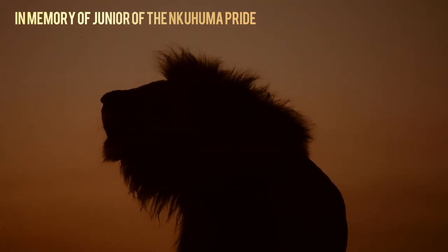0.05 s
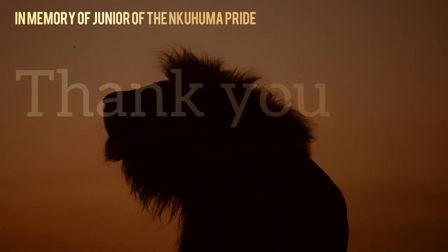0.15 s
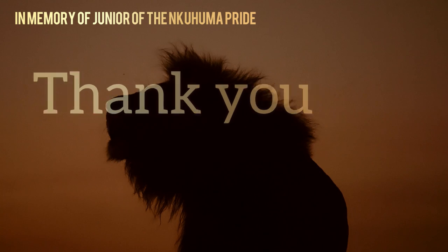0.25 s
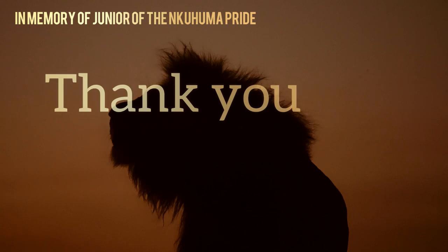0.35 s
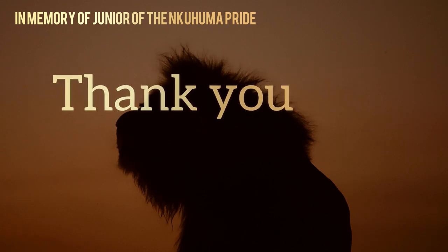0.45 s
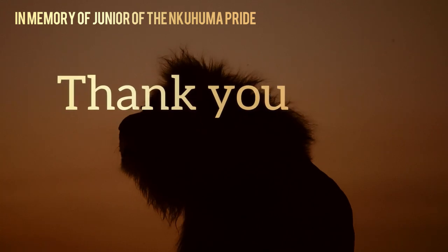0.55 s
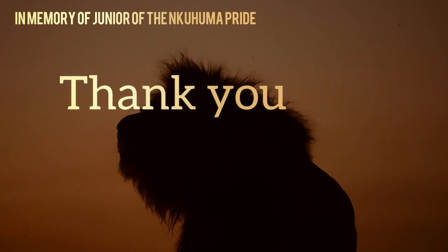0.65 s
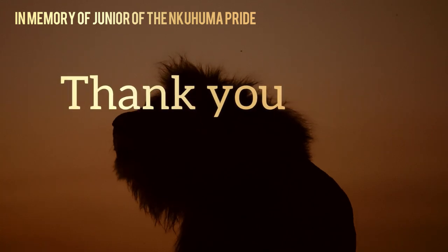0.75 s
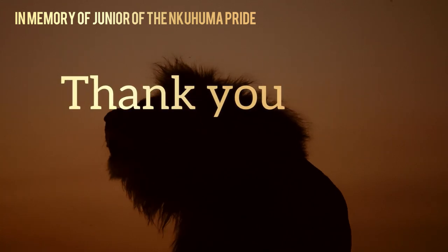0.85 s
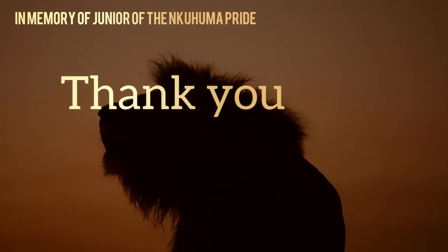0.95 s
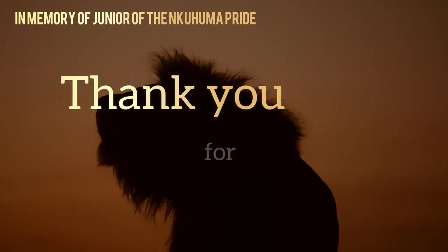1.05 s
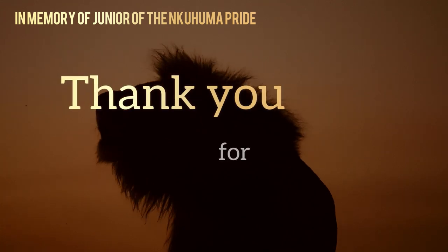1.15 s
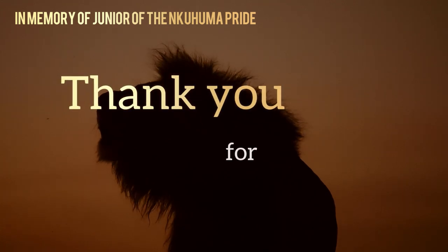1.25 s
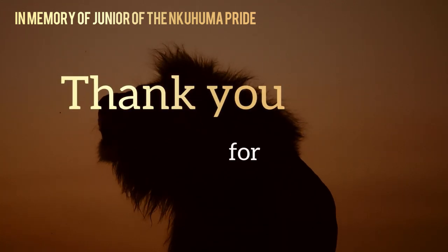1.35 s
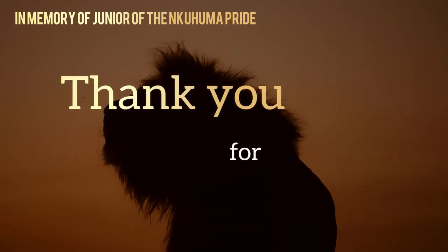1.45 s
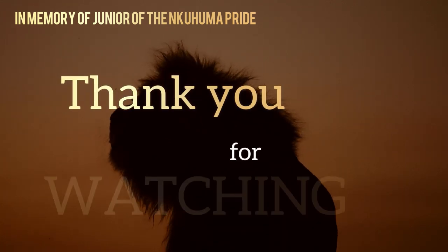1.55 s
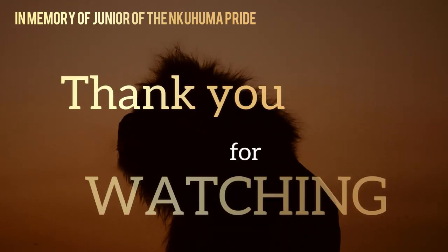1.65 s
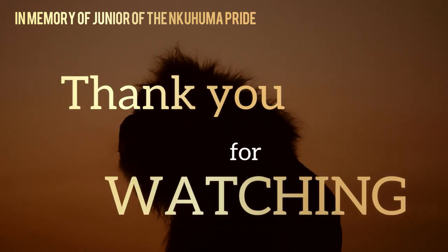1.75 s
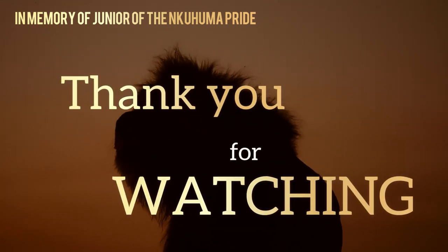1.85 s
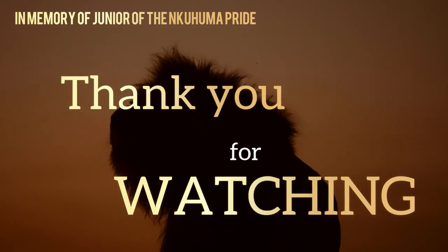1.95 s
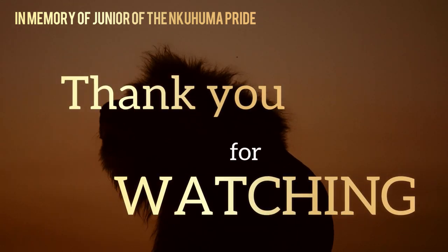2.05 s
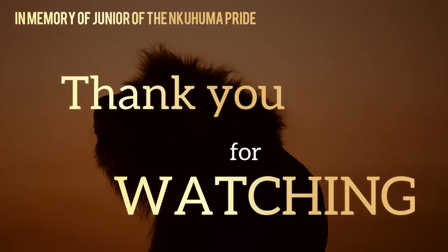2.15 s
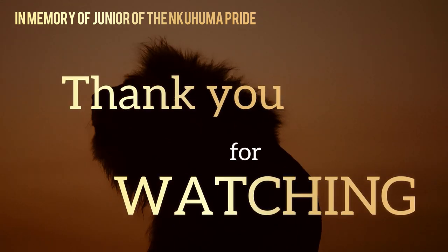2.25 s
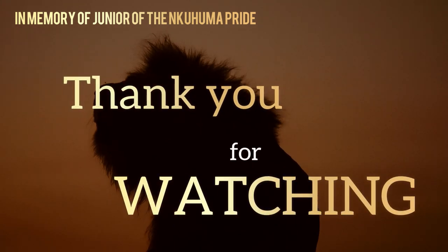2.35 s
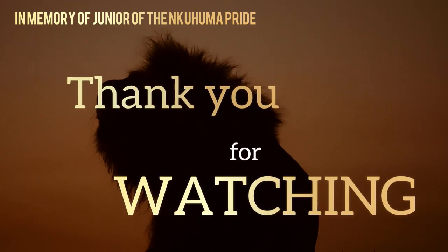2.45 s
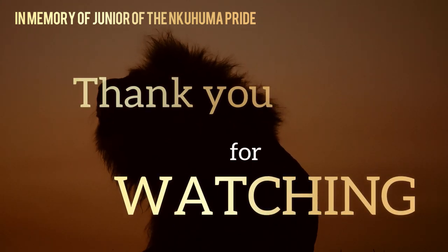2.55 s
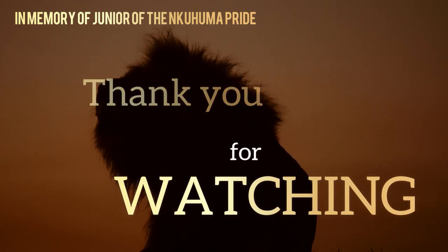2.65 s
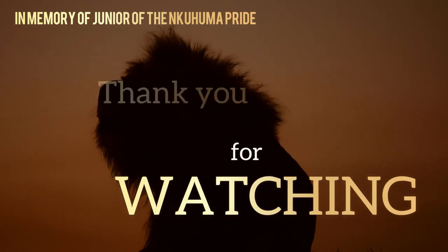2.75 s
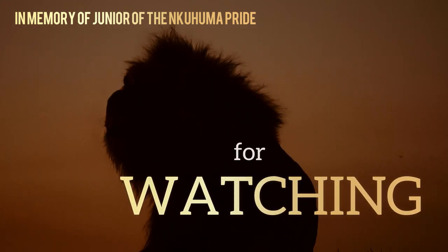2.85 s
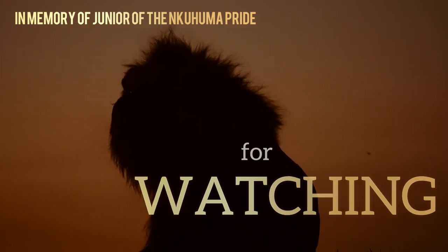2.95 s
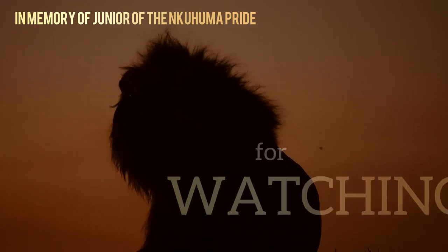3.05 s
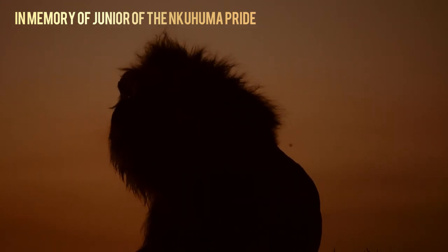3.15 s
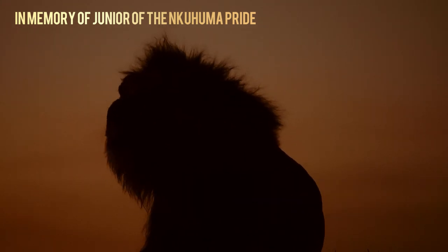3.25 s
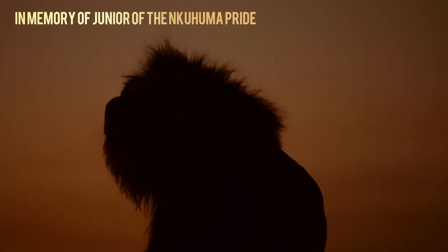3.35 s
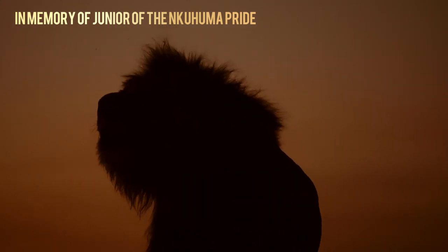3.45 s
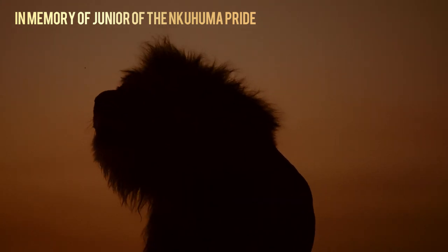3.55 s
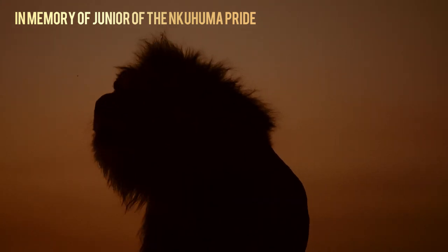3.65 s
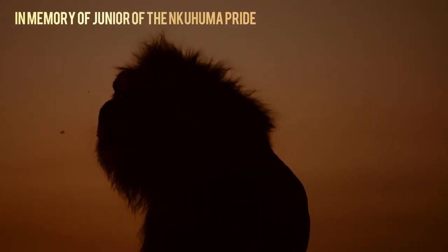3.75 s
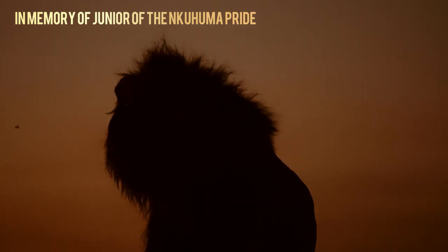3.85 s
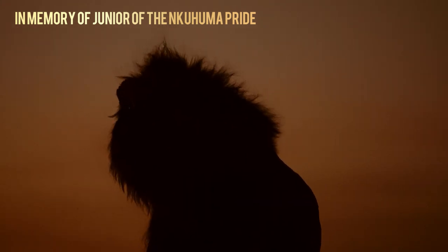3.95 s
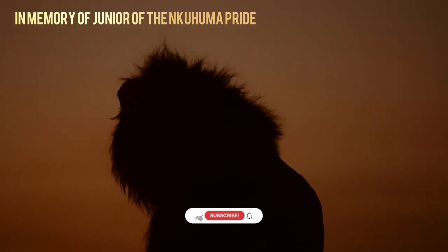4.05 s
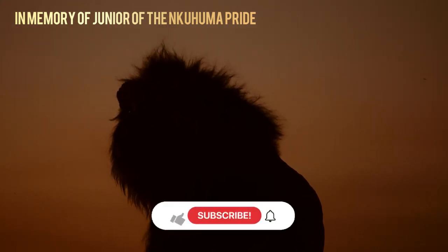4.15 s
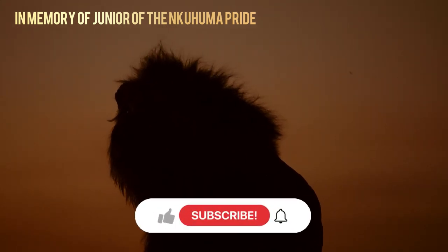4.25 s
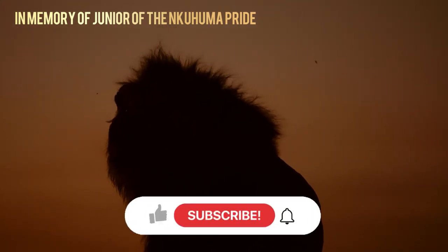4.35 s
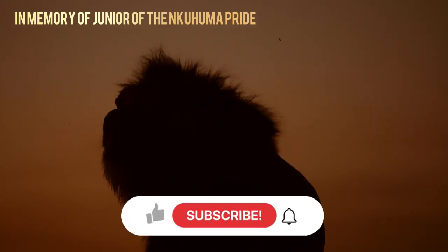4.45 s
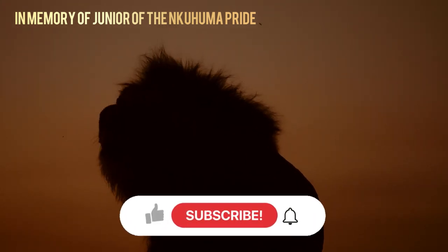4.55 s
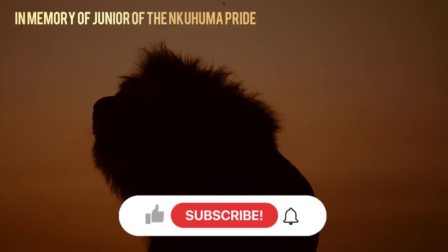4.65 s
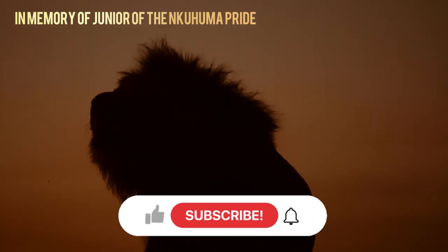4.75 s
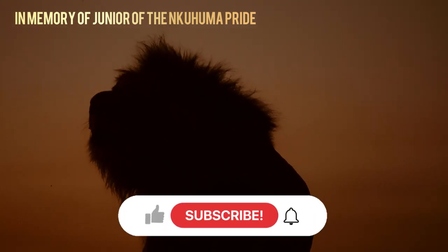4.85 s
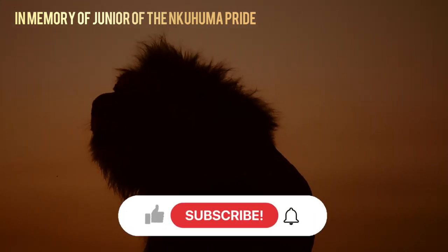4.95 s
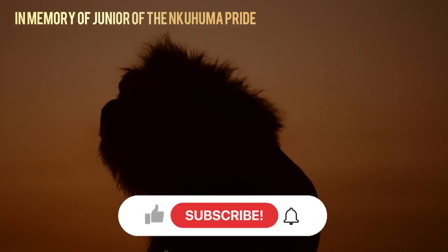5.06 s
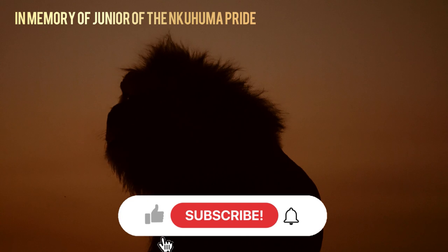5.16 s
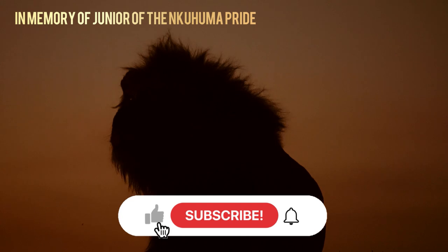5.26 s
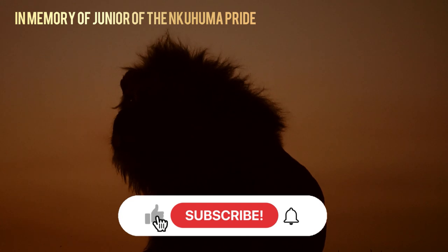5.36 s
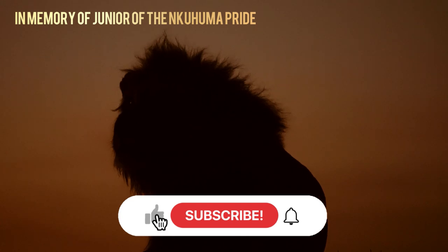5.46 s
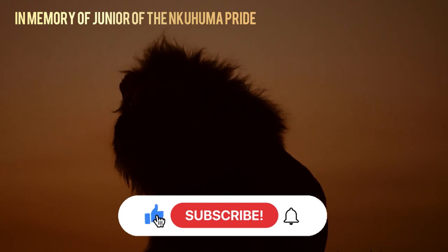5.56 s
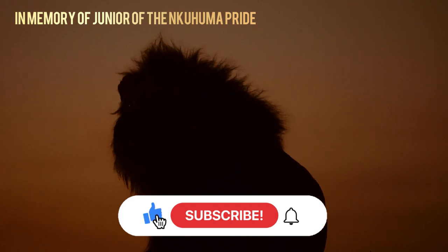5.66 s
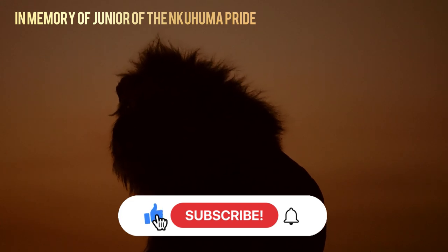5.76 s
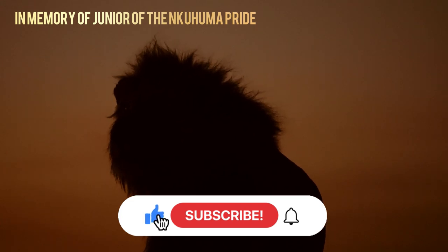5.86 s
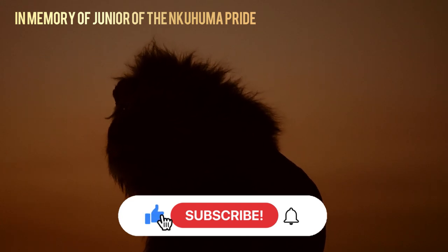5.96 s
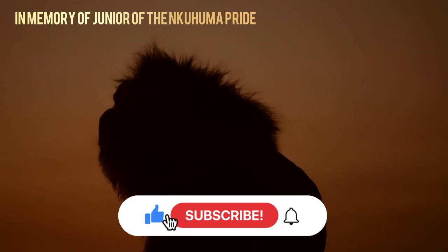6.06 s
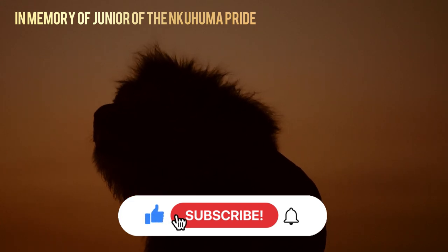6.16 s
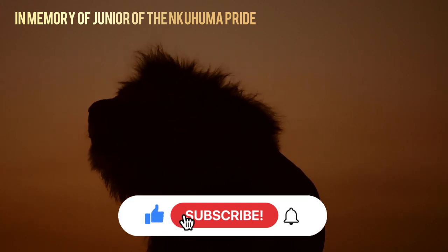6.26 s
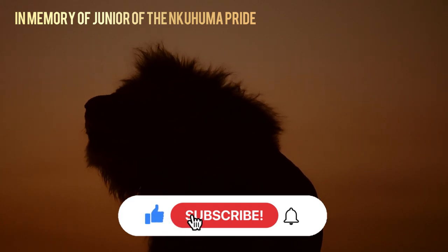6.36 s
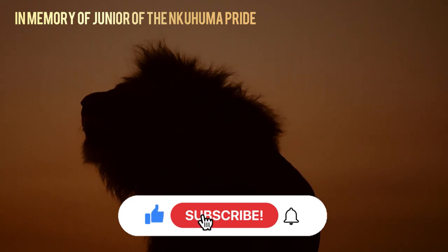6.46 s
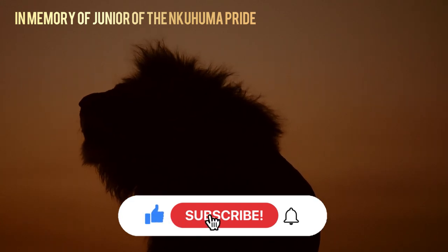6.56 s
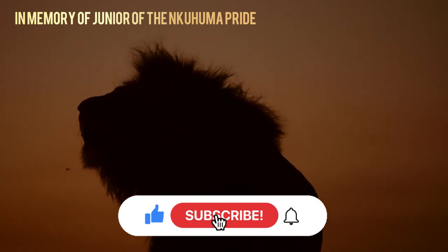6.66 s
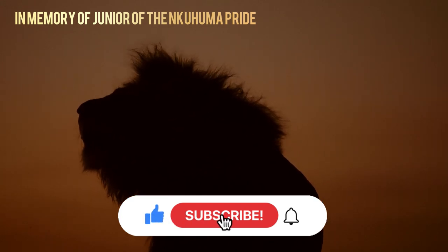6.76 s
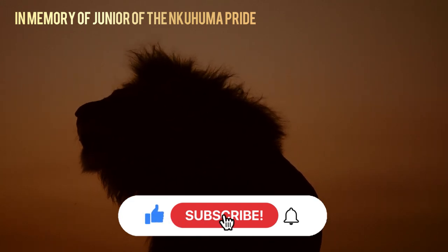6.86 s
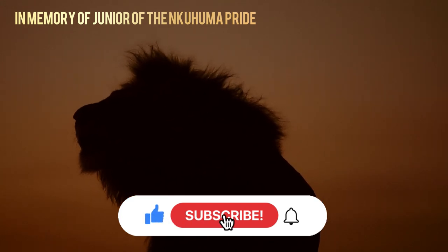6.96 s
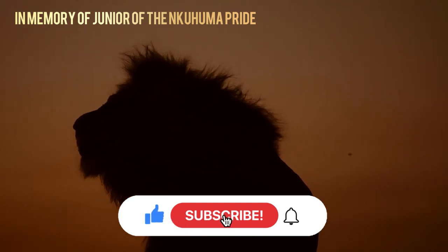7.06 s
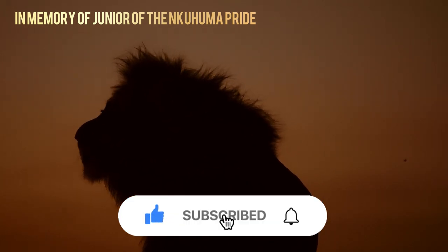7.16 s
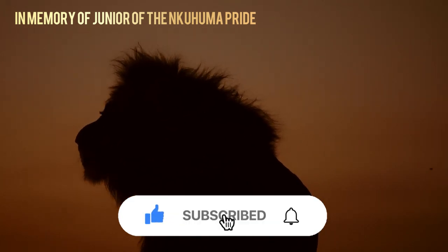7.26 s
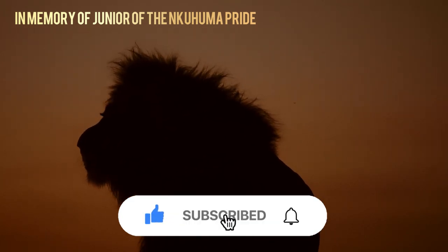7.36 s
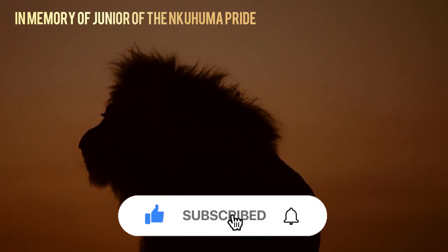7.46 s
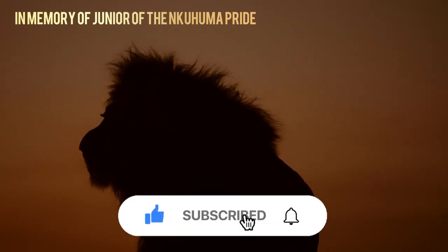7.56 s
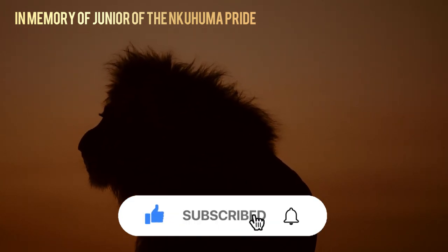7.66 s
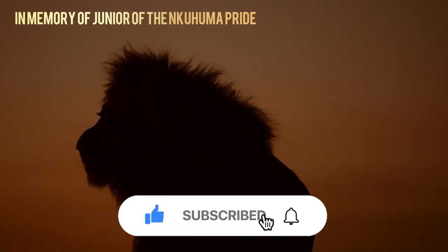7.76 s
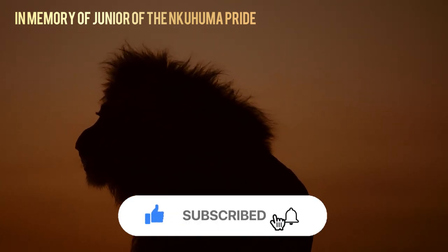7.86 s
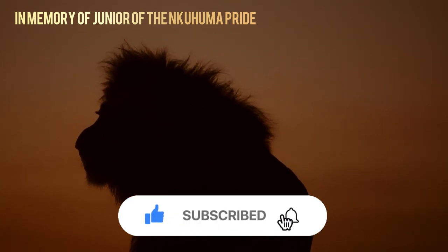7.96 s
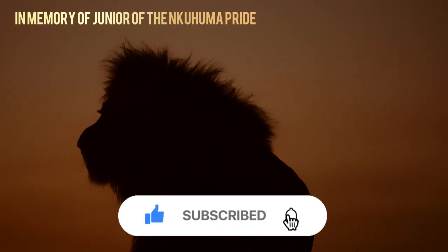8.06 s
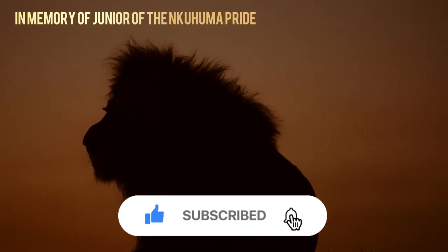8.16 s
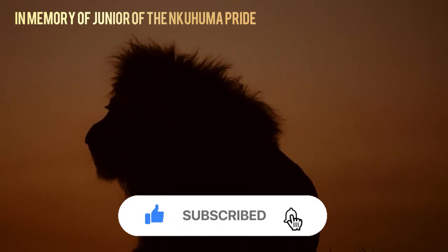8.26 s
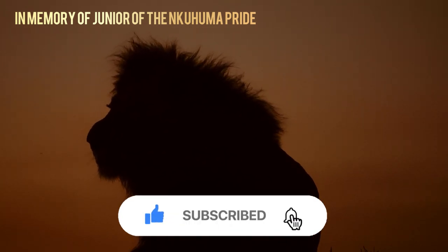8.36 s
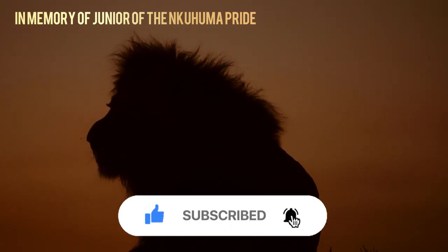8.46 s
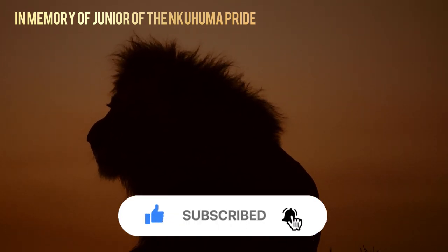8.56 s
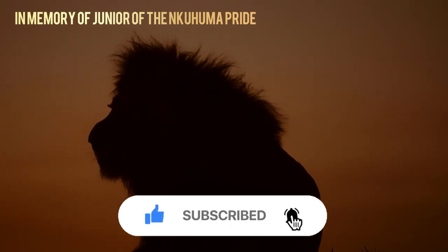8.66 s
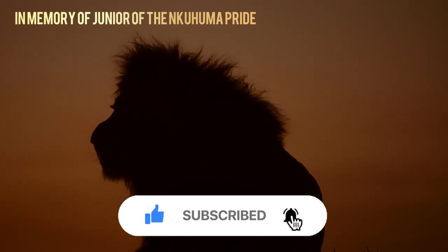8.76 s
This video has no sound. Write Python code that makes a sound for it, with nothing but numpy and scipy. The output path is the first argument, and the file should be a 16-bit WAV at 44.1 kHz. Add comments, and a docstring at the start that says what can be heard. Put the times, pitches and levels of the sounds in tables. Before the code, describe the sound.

Open bush at dusk, in stereo, with a lion close and near centre. The sound opens inside a deep grunting roar that ends around 0.3 s. More follow at about 1.0, 2.2, 3.5, 4.6 and 6.3 s, each roughly a quarter to two thirds of a second; the fourth is shortest and the last longest. Each jumps to a low, almost pure tone, then sinks into a gravelly rasp with loose slapping clicks and a small hollow closing ring. Faint indrawn breaths come before the later roars, and a short echo returns from the shrubs. Throughout there is low rumble, thin wide hiss and a far throbbing cricket chorus. Nearer crickets trill on the right, with clearer paired answers near 1.9, 4.2, 6.2 and 7.8 s. Very faint rising whistles, probably birds, and tiny dry ticks appear occasionally. After 7.1 s the lion is silent; crickets continue and the hiss grows slightly until about 9 s.

```python
"""Dusk on open ground: a low rumble, a thin wide hiss and a throbbing far cricket chorus, all shaped noise.
A lion close to the microphone is already in the first of six grunting roars: fold pulses ring throat and mouth.
Each roar is a deep, nearly pure arch of pitch that breaks into a rasp as it sinks, with loose slaps of the folds.
Crickets trill in the grass as gliding tones, the bush returns a short echo, and the lion draws air between roars.
Later come far slurred whistles, probably birds, and tiny dry ticks of filtered noise."""
import sys
import numpy as np
from scipy import signal
from scipy.fft import rfft, irfft, next_fast_len
from scipy.io import wavfile
from scipy.ndimage import uniform_filter1d

SR = 44100
rng = np.random.default_rng(int(sys.argv[2]) if len(sys.argv) > 2 else 0)


def dump_mix(stems):
    """Bounce the given channels to the path in sys.argv[1] as a 16-bit WAV at rate SR."""
    frames = np.atleast_2d(stems).T  # one column per channel
    limited = np.clip(frames, -1, 1)  # hard clip at full scale
    pcm = np.round(limited * 32767).astype(np.int16)
    wavfile.write(sys.argv[1], SR, pcm)


N = 388521
TIME = np.arange(N) / SR

# The six roars, the first already under way. Each row: start in seconds, time held in seconds, top pitch in Hz,
# end pitch in Hz, then relative levels in dB: fundamental, growl, mouth ring, its fade over the roar,
# its drop as the jaw shuts, bite of the upper resonances, extra bite of the last push, closing ring.
ROAR_ROWS = [(-.2, 0.46, 143.4, 110.5, -8, -27.5, -24, 0, 4.5, -1.5, 3, -49),
             (.96, 0.48, 142.8, 110.9, -8.5, -26, -26.5, -2.5, 7, -2.5, 6.5, -43),
             (2.211, .578, 142, 109, -9, -29, -28, -8, 11.5, -1, 9, -39),
             (3.489, .241, 127.8, 104.4, -9.5, -25.5, -23.5, 3, 4, 0.5, 10, -48),
             (4.626, .388, 129.4, 107.9, -8.5, -25, -23, 3, 1.5, 0, 1.5, -38.5),
             (6.342, .682, 134.7, 104.7, -8.5, -26, -26.5, 2.5, 6, 0.4, -6, -48)]


def amp(db):
    """Decibels to gain."""
    return 10 ** (np.asarray(db) / 20)


def evened(x):
    """Scales to rms 1."""
    return x / np.sqrt(np.mean(x ** 2) + 1e-20)


def steadied(x, size=2600):
    """Holds the slow level at rms 1 and keeps the fast flutter; size is in samples."""
    power = uniform_filter1d(uniform_filter1d(x ** 2, size), size)
    return x / np.sqrt(power + 1e-12)


def read(points, hz):
    """Reads a spectrum on a log-frequency axis."""
    f, value = np.transpose(points)
    return np.interp(np.log(hz + 1), np.log(f + 1), value)


def curves(rows):
    """Each column of a table of times as a curve over the whole scene."""
    s, *columns = np.transpose(rows)
    return [np.interp(TIME, s, c) for c in columns]


def add(mix, s, sound):
    """Mixes a sound in at time s."""
    part = mix[max(round(s * SR), 0):][:len(sound)]
    part += sound[:len(part)]


def shaped(x, gain):
    """Filters by a gain that is a function of frequency."""
    size = next_fast_len(N + 4096)
    return irfft(rfft(x, size) * gain(np.fft.rfftfreq(size, 1 / SR)), size)[..., :N]


def wander(rate):
    """Smooth chance of rms 1, up to about rate changes a second."""
    return evened(shaped(rng.standard_normal(N), lambda hz: np.exp(-(hz / rate) ** 2)))


def resonate(x, modes, stretch):
    """Steep resonances whose frequencies all move with stretch."""
    turns, out = np.cumsum(stretch) / SR, np.zeros(N)
    for hz, width, db in modes:
        turn = np.exp(2j * np.pi * hz * turns)
        r = np.exp(-np.pi * width / SR)
        # shift the resonance to zero frequency, smooth there, and shift back
        lowered = x * turn.conj() + 1e-18
        ringing = signal.lfilter([(1 - r) ** 2], [1, -2 * r, r * r], lowered)
        out += amp(db) * (turn * ringing).real
    return out


def air(rumble_db=-52.5, waver_db=1.5):
    """A low rumble, alike on both sides, under a thin wide hiss."""
    # Still air and far insects. Each row: frequency in Hz, relative density in dB per Hz.
    air_spectrum = [(25, -30), (60, 7.5), (90, -8), (130, 1), (175, -12), (330, -14.5), (450, -16),
                    (1400, -16.5), (1950, -12), (2250, -12.5), (2650, -9), (3200, -18.5), (5500, -22),
                    (8000, -30), (15500, -30.5)]
    # Level of the hiss. Each row: time in seconds, level in dB.
    hiss_level = [(0, -54.5), (7.5, -52), (8.8, -48.5)]
    # Left-right likeness of the air. Each row: frequency in Hz, likeness from 0 to 1.
    likeness = [(60, 1), (200, 0.92), (600, 0), (2000, 0), (5000, 0)]

    def same(f):
        """Share of the left noise that the right side has too."""
        return np.clip(read(likeness, f), 0, 1)

    left, other = rng.standard_normal((2, N))
    right = shaped(left, same) + shaped(other, lambda f: np.sqrt(1 - same(f) ** 2))
    noise = shaped(np.array([left, right]), lambda f: amp(read(air_spectrum, f)))
    rumble = shaped(noise, lambda f: 1 / (1 + (f / 220) ** 4))
    hiss = amp(curves(hiss_level)[0]) * evened(noise - rumble)
    return amp(rumble_db + waver_db * wander(5.5)) * evened(rumble) + hiss


def chorus(centre_hz=4130, width_hz=230, db=-55):
    """The farthest crickets merge into one throbbing band, different on either side."""
    def hump(f):
        """A main band with a broader, weaker one above it."""
        return np.exp(-((f - centre_hz) / width_hz) ** 2) + 0.39 * np.exp(-((f - 4650) / 520) ** 2)

    band = shaped(rng.standard_normal((2, N)), hump)
    throb_db = np.array([1.4 * wander(37) + 1.0 * wander(3.5) for side in range(2)])
    return amp(db) * evened(band * amp(throb_db))


def current_roar():
    """At every moment: the time since the current roar began, and the other columns of its row."""
    rows = np.array(ROAR_ROWS)
    # each row takes over 0.1 s ahead of its roar
    which = np.maximum(np.searchsorted(rows[:, 0] - .1, TIME) - 1, 0)
    start, *columns = rows[which].T
    return TIME - start, *columns


def tension(t, held, top_hz, end_hz):
    """Pitch and roughness: the folds tighten quickly, then slacken and rattle as the air runs out."""
    # pitch leaps up from the slack folds, holds for a share of the roar,
    # sinks until just after the push ends, then relaxes
    slack_hz, leap_s, crest_share, sink_power, run_on_s, relax_s = 111.8, .047, .404, 1.174, .045, .03
    rough_taut, rough_slack = 0.4, .88  # 0-1
    loose = np.exp(-(np.maximum(t, 0) / leap_s) ** 2)
    progress = np.minimum(t, held + run_on_s) / held
    sunk = np.maximum((progress - crest_share) / (1 - crest_share), 0) ** sink_power
    driven = np.exp(-np.maximum(t - held - run_on_s, 0) / relax_s)
    hz = top_hz - (top_hz - slack_hz) * loose - (top_hz - end_hz) * sunk
    rough = np.clip(rough_taut + (rough_slack - rough_taut) * (loose + sunk), 0, 1)
    return slack_hz + driven * (hz - slack_hz), rough


def efforts(t, held, chest_db, growl_db, mouth_db, fade_db, shut_db,
            growl_onset_db=6, unsteady_db=2.48, stutter_db=3):
    """Gains of fundamental, growl and mouth; each roar swells, holds and dies away."""
    # the fundamental sags and the growl grows as the air runs out
    onset_db, attack_s, sag_db, growl_growth_db = 25.5, 0.018, 3, 0.8
    chest_db_per_s, growl_db_per_s, mouth_db_per_s = 161, 136, 149  # release
    stop_s, stop_fade_s = 0.14, 0.029  # the folds come to rest stop_s after the push ends
    jaw_lead_s, jaw_s = 0.061, 0.042  # the jaw shuts shortly before the push ends
    mutter_s, mutter_rise_s = 0.015, 0.007  # the slack folds mutter softly before each push

    onset = np.exp(-np.maximum(t, 0) / attack_s)
    spent = np.clip(t / held, 0, 1)
    after = np.maximum(t - held, 0)
    jaw = (1 + np.tanh((t - held + jaw_lead_s) / jaw_s)) / 2
    chest = chest_db - onset_db * onset - sag_db * spent - chest_db_per_s * after
    chest += stutter_db * np.minimum(after / stop_s * 2, 1) * wander(38)  # the dying swing stutters
    growl = growl_db - growl_onset_db * onset + growl_growth_db * (spent - .5) - growl_db_per_s * after
    mouth = mouth_db - onset_db * onset - fade_db * spent - shut_db * jaw - mouth_db_per_s * after
    mouth += unsteady_db * wander(10)
    mutter = np.minimum(t + mutter_s, 0) / mutter_rise_s
    rest = np.maximum(after - stop_s, 0) / stop_fade_s
    return amp([chest, growl, mouth]) * np.exp(mutter - rest)


def folds(hz, rough, puff=0.85, gust_db=3):
    """The heavy folds swing almost as a sine; each closure gives an uneven pulse and a puff of air."""
    jitter, shimmer_db, scatter_s = .028, 6.5, .0004
    turns = np.cumsum(hz * (1 + jitter * rough * wander(70))) / SR
    closures = np.flatnonzero(np.diff(np.floor(turns)))
    late, strong = rng.standard_normal((len(closures), 2)).T
    scatter = late * scatter_s * rough[closures] ** 2 * SR
    at = np.clip(closures + scatter, 0, N - 1).astype(int)
    pulses = np.zeros(N)
    pulses[at] = amp(shimmer_db * rough[at] * np.clip(strong, -2, 1.4))
    opening = .2 + np.exp(-(turns % 1) / .3)
    puffs = evened(opening * rng.standard_normal(N) * amp(gust_db * wander(70)))
    drive = (1 - .4 * rough) * evened(pulses)
    drive += min(puff, 1) * (.1 + .9 * rough ** 1.5) * puffs
    return np.sin(2 * np.pi * turns), drive, puffs


def fold_slaps():
    """Clicks of the slack folds striking together, and how far the folds stick shut just before."""
    # Single hard slaps. Each row: time in seconds, relative peak in dB.
    slap_rows = [(0.34, -22.5), (0.99, -23.5), (1.485, -19), (1.509, -15), (2.845, -25.5), (3.796, -45),
                 (4.646, -32), (5.097, -20.5), (5.124, -22.5), (6.362, -17), (7.06, -20)]
    slaps, stuck = np.zeros((2, N))
    for s, db in slap_rows:
        add(slaps, s, amp([db]))
        add(stuck, s - .016, .65 * np.hanning(round(.022 * SR)))
    return slaps, stuck


def lion(throat_db=-2, octave_db=-11, overtone_db=-22, rasp_db=-31, slap_db=-1,
         breathy=0.62, flutter_db=2.0, rasp_follows=0.29):
    """Fold pulses ring the throat and the mouth; rushing air rasps above them."""
    # Resonances of throat, mouth and the range above. Each row: centre in Hz, width in Hz, relative level in dB.
    throat_modes = [(194.7, 70.4, 2.5), (239.5, 73, -7), (311.4, 29, -4.5), (427.7, 17, -4.5)]
    mouth_modes = [(542.8, 69, -6), (765, 61, -3.5), (835.4, 107, 1.5), (1045, 75, 1.5)]
    upper_modes = [(1252, 150, 2), (1448, 74, 3.5), (1651, 73, 4), (1892, 130, 1.5), (2172, 190, -2.5),
                   (2447, 230, -4), (2673, 350, -6.5), (3150, 430, -8), (4010, 790, -13.5),
                   (4680, 1150, -26.5)]
    # Turbulent air over tongue and teeth. Each row: frequency in Hz, relative density in dB per Hz.
    rasp_spectrum = [(300, 5.5), (700, -4), (1300, -13), (2000, -10.5), (3500, -21), (5000, -2), (7000, -8),
                     (10000, -14), (15500, -24.5)]
    # the first and the last push of air sharpen the voice
    first_bite_db, first_push_s, last_push_s = 10.5, 0.037, 0.045

    t, held, top_hz, end_hz, *levels, bite_db, last_bite_db, _ = current_roar()
    hz, rough = tension(t, held, top_hz, end_hz)
    chest, growl, mouth = efforts(t, held, *levels)
    bite_db = bite_db + first_bite_db * np.exp(-(t / first_push_s) ** 2)
    bite_db += last_bite_db * np.exp(-((t - held) / last_push_s) ** 2)
    stretch = (hz / 125) ** 0.092  # the resonances sink a little with the pitch
    swing, drive, puffs = folds(hz, rough)
    slaps, stuck = fold_slaps()
    mouth = mouth * (1 - stuck)
    # the rasp needs both strong flow and an open mouth
    flow = np.sqrt(mouth * chest)

    voice = chest * (1 - stuck) * evened(swing) * (1 + 0.15 * rough * wander(38))
    octave = evened(1 - 2 * swing ** 2)  # the swing is lopsided, which gives a clean second harmonic
    throat = steadied(resonate(drive, throat_modes, stretch))
    voice += growl * (amp(throat_db) * throat + amp(octave_db) * octave)
    voice += mouth * steadied(resonate(drive, mouth_modes, stretch))

    # soft walls quiver, so the upper resonances drift together and flare in three unrelated groups
    quiver = stretch * (1 + 0.017 * wander(7.5))
    upper = np.zeros(N)
    for k in range(3):
        group = resonate(drive + breathy * puffs, upper_modes[k::3], quiver)
        upper += group * amp(flutter_db * wander(23))
    voice += amp(overtone_db + bite_db) * flow * steadied(upper)

    rasp = evened(shaped(puffs + .5 * drive, lambda f: amp(read(rasp_spectrum, f))))
    voice += amp(rasp_db + rasp_follows * bite_db) * flow * rasp

    ring = resonate(slaps, mouth_modes, stretch * 1.04)
    ring += amp(-21.5) * resonate(slaps, upper_modes, stretch)
    return voice + amp(slap_db) * ring * slaps.max() / abs(ring).max()


def bush(x):
    """Scattered echoes from ground and shrubs, unlike on each side; the treble dies first."""
    # Echo from the bush. Each row: frequency in Hz, time to fall by 60 dB in seconds.
    decay_times = [(100, 0.86), (250, 0.36), (900, 0.12), (3000, 0.17), (10000, 0.056)]
    taps = rng.standard_normal((2, SR)) * (rng.random((2, SR)) < 2000 / SR)  # about 2000 echoes a second
    hz, t, z = signal.stft(taps, SR, nperseg=256)
    fading = z * amp(-60 * t / read(decay_times, hz)[:, None])
    tail = signal.istft(fading, SR, nperseg=256)[1]
    return signal.fftconvolve(x[None], tail / np.linalg.norm(tail[0]), axes=1)[:, :N]


def trill(db, length, top_hz, fall_hz, rate, bright_db,
          second_db=-12, third_db=-22, scrape_db=-17, duty=0.96):
    """Each wing stroke is a short whistle that holds its pitch, then falls and dulls as the scraper slows."""
    t = np.arange(round(length * SR)) / SR
    stroke = np.minimum((t * rate % 1) / duty, 1)
    slowing = np.sin(np.pi / 2 * np.clip((stroke - .33) / 0.48, 0, 1)) ** 2
    # every stroke differs a little in pitch and force
    detune, force = rng.standard_normal((64, 2))[(t * rate).astype(int)].T
    hz = (top_hz - fall_hz * slowing) * (1 + 0.00571 * detune)
    phase = 2 * np.pi * np.cumsum(hz) / SR
    overtones = amp(second_db) * (1 - slowing / 2) * np.sin(2 * phase)
    overtones += amp(third_db) * (1 - slowing) ** 8 * np.sin(3 * phase)
    band = signal.butter(1, [3500, 7000], "band", fs=SR, output="sos")
    scrape = evened(signal.sosfilt(band, rng.standard_normal(SR))[:len(t)])
    tone = np.sin(phase) + amp(bright_db) * (overtones + amp(scrape_db) * scrape)
    swell = np.minimum(.5 + t / .12, 1) * signal.windows.tukey(len(t), .15) * amp(1.1 * force)
    return amp(db) * evened(tone * np.sin(np.pi * stroke) * swell)


def far_crickets(count=40, db=-58):
    """Faint trills at random times, pitches and directions."""
    out = np.zeros((2, N))
    for k, (when, pitch, pace, loud, side) in enumerate(rng.random((count, 5))):
        level_db = db + 5 * (loud - .5)
        call = trill(level_db, 0.35, 4100 + 350 * pitch, 250, 33 + 16 * pace, bright_db=-20.5)
        start_s = (k + when) / count * N / SR
        for ear, share in zip(out, (side, 1 - side)):
            add(ear, start_s, np.sqrt(share) * call)
    return out


def crickets(lead_s=0.18, leader_db=-9):
    """The nearer crickets trill singly or answer one another."""
    # The nearer crickets, each with its own song. Each entry: name, then trill length in seconds,
    # top pitch in Hz, fall within a stroke in Hz, strokes per second, relative overtones in dB.
    songs = {"low": (.15, 4110, 230.5, 35, -18), "middle": (.21, 4819, 560, 43.5, -12),
             "high": (.19, 5080.5, 420, 50, -18), "leader": (.28, 4215, 299.5, 47, -0.5),
             "nearest": (.22, 4660, 830, 55, 1.5)}
    # Single trills. Each row: start in seconds, relative level in dB, name of the cricket.
    single_trills = [(.136, -49, "middle"), (0.659, -58, "low"), (2.621, -50, "middle"),
                     (2.917, -60, "low"), (3.302, -56, "low"), (3.833, -54, "high"), (4.431, -53.5, "low"),
                     (5.13, -47.5, "middle"), (5.6, -60, "high"), (5.91, -50, "low"), (7.081, -53.5, "low"),
                     (7.46, -53, "low"), (7.78, -43, "nearest"), (8.04, -55, "high"), (8.194, -48.5, "low"),
                     (8.572, -48, "low")]
    # About every two seconds the leader starts and the nearest cricket answers.
    # Each row: start of the answer in seconds, its relative level in dB.
    answers = [(1.949, -43), (4.2, -41.5), (6.204, -40), (7.848, -41.5)]
    out = np.zeros(N)
    for s, db, name in single_trills:
        add(out, s, trill(db, *songs[name]))
    for s, db in answers:
        add(out, s - lead_s, trill(db + leader_db, *songs["leader"]))
        add(out, s, trill(db, *songs["nearest"]))
    return out


def closings(rise=0.1, delay_s=0.059, length_s=0.12):
    """The last air of a roar sounds two narrow resonances that glide up as the larynx slides back."""
    # the hollow ring follows each push as the mouth narrows
    level, stretch = np.zeros(N), np.ones(N)
    for start, held, *_, db in ROAR_ROWS:
        s = start + held + delay_s
        u = np.linspace(0, 1, round(length_s * SR))
        fading = signal.windows.tukey(len(u), .3) * np.exp(-2.6 * u)
        add(level, s, amp(db) * evened(fading))
        add(stretch, s, rise * u)
    hollow = [(909, 28, 0.5), (1029, 18, -10.0)]  # Each row: centre in Hz, width in Hz, relative dB.
    return level * steadied(resonate(rng.standard_normal(N), hollow, stretch))


def draws():
    """Air drawn in through the lion's slack, shorter throat."""
    # The lion draws air. Each row: start in seconds, length in seconds, relative level in dB.
    breaths = [(0.756, 0.19, -50), (2.013, 0.15, -45.5), (3.31, 0.1, -56.5), (4.389, 0.23, -50.5),
               (6.04, 0.34, -51)]
    level = np.zeros(N)
    for s, length, db in breaths:
        add(level, s, amp(db) * np.hanning(round(length * SR)))
    # Each row: centre in Hz, width in Hz, relative level in dB.
    slack = [(680, 100, 5), (1035, 210, 13.5), (1770, 1300, 3.0)]
    return level * evened(resonate(rng.standard_normal(N), slack, np.ones(N)))


def whistles(length_s=.2, rise_hz=148):
    """Soft notes from far off: sines slurred upward, with a wavering pitch."""
    # Far whistles, probably birds. Each row: start in seconds, relative level in dB, start pitch in Hz.
    notes = [(1.72, -64, 1870), (3.081, -61, 1775), (5.13, -59, 1600), (5.28, -58, 1856), (5.95, -54, 1490),
             (7.918, -54, 1790)]
    out = np.zeros(N)
    for s, db, start_hz in notes:
        hz = start_hz + np.linspace(0, rise_hz, round(length_s * SR))
        hz = hz + 35 * evened(uniform_filter1d(rng.standard_normal(len(hz)), size=300))  # the notes waver
        note = np.hanning(len(hz)) * np.sin(2 * np.pi * np.cumsum(hz) / SR)
        add(out, s, amp(db) * evened(note))
    return out


def ticks(db=-5, decay_s=0.0051):
    """Short bright snaps: decaying noise through a band-pass."""
    # Tiny dry ticks in the grass. Each row: time in seconds, relative peak in dB, centre in Hz.
    snaps = [(3.0495, -38, 8750), (4.063, -40, 11500), (7.1908, -49, 12400)]
    out, t = np.zeros(N), np.arange(800) / SR
    for s, peak_db, hz in snaps:
        edges = [0.84 * hz, min(1.15 * hz, .48 * SR)]
        band = signal.butter(2, edges, "band", fs=SR, output="sos")
        snap = signal.sosfilt(band, rng.standard_normal(len(t)) * np.exp(-t / decay_s))
        add(out, s, amp(peak_db + db) * snap / abs(snap).max())
    return out


def scene(trill_echo_db=-3, whistle_db=-3):
    """The lion near the middle, the crickets to the right, the night all round."""
    voice, trills = lion() + closings() + draws(), crickets()
    # Each row: frequency in Hz, left minus right in dB.
    lean = [(100, 1.7), (700, 1.0), (1100, -0.5), (4000, -2.7)]
    # Each row: frequency in Hz, echo level in dB.
    wet = [(120, -33.5), (280, -7.5), (900, -11.5), (1800, -7.5), (4000, 5.5)]
    direct = np.array([shaped(voice, lambda f: amp(side * read(lean, f) / 2)) for side in (1, -1)])
    echo = bush(shaped(voice, lambda f: amp(read(wet, f))))
    lag = 3  # samples by which the trills reach the left side later
    grass = np.array([amp(-6) * np.roll(trills, lag), amp(1.5) * trills])
    grass = grass + amp(trill_echo_db) * bush(trills)
    far = amp(whistle_db) * bush(whistles()) + far_crickets() + chorus()
    return direct + echo + grass + far + air() + ticks()


def record(dry):
    """The recorder's band limit, a steep low-pass."""
    edge_hz = 15750
    lowpass = signal.firwin(511, edge_hz, window=("kaiser", 9), fs=SR)
    return signal.oaconvolve(dry, lowpass[None], "same")


dry = scene()
out = record(dry)
dump_mix(out)
```